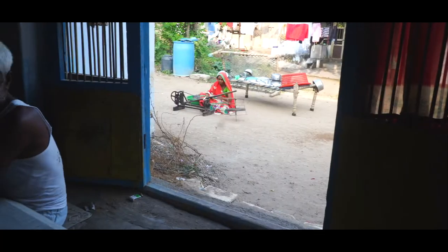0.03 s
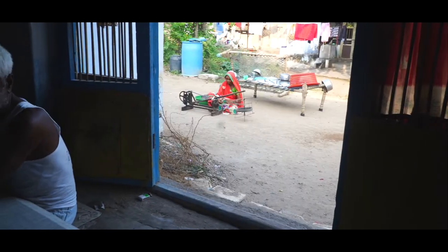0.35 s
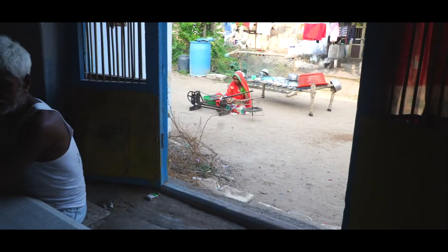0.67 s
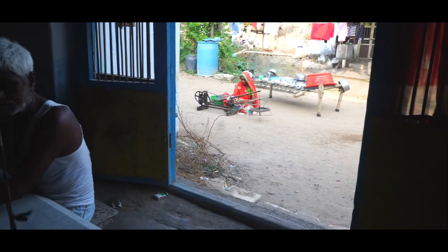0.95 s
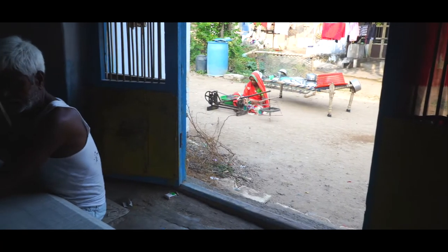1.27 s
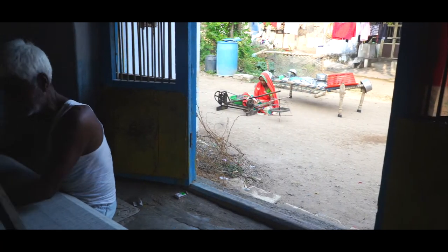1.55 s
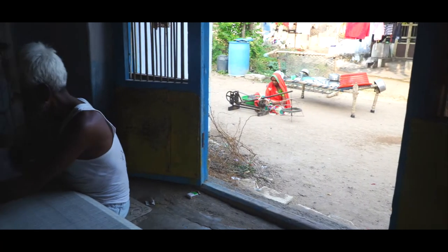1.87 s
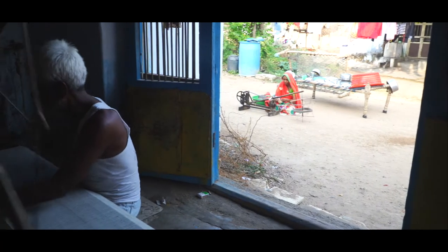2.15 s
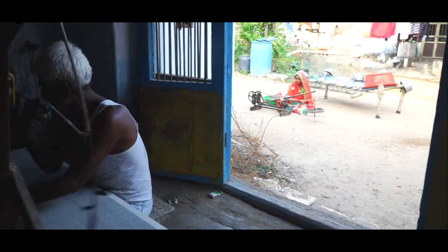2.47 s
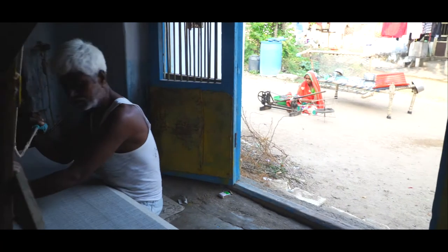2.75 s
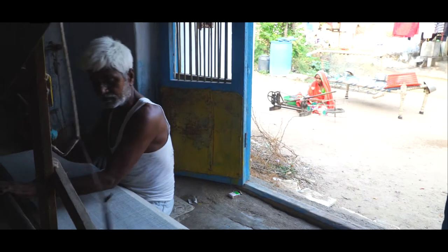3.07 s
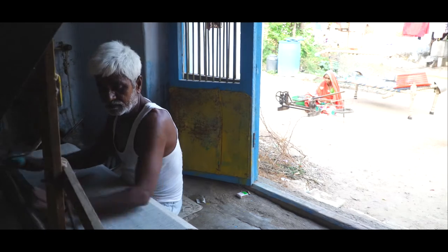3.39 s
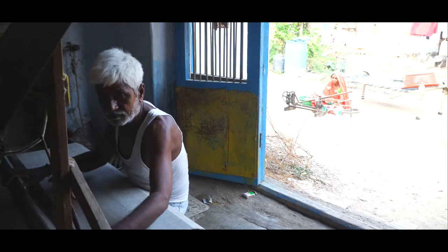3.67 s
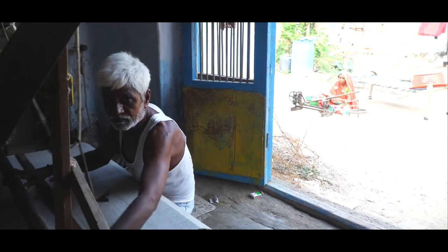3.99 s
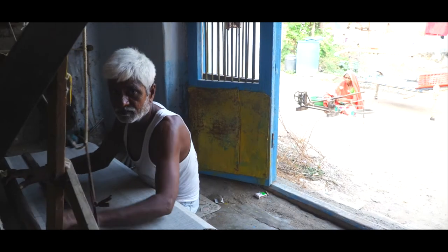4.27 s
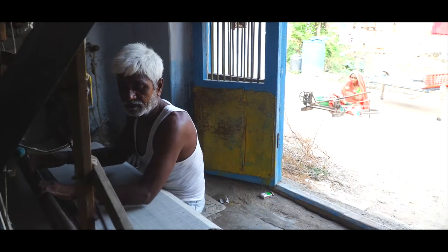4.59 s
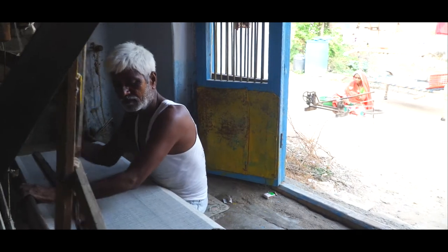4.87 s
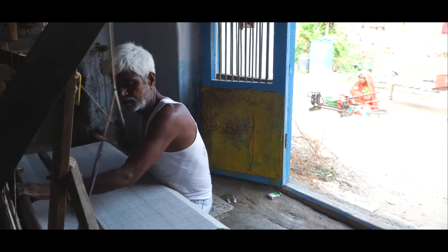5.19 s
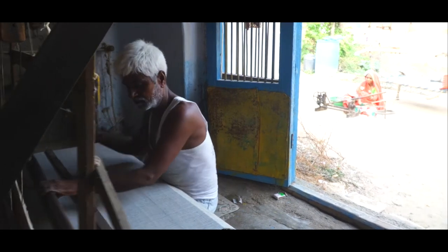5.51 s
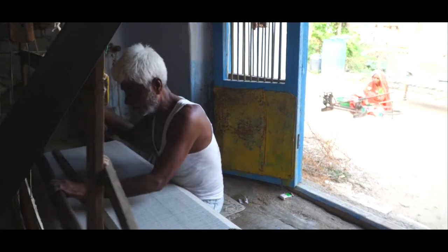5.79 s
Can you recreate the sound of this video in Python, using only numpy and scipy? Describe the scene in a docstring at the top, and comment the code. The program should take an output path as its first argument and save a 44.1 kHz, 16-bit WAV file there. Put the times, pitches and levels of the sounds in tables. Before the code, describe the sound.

A wooden handloom works in a steady rhythm, about one pass every three quarters of a second. In each pass the shafts tap, the beater knocks, a cord snaps and the shuttle slams into its box, alternately sharp and near, then duller and farther off. Threads rub faintly between the blows. The microphone stands beside the loom in a small, slightly echoing room, with a soft draught rumbling underneath.

```python
"""A wooden fly-shuttle handloom works in a small plastered room with the door open. In each pass the shafts
tap, the beater knocks, the cord snaps the picker, and the shuttle hops across the warp and slams into its box,
near and far in turn. Each impact excites the modes of the wood and the reverberation of the room. Friction
makes the warp rub and the shuttle squeak faintly. Over the quiet air of the yard, a draught rumbles on the
microphone, which turns from the door to the loom midway."""
import sys
import numpy as np
from scipy import signal
from scipy.fft import rfft, irfft
from scipy.io import wavfile
from scipy.ndimage import uniform_filter1d

SR = 44100
rng = np.random.default_rng(int(sys.argv[2]) if len(sys.argv) > 2 else 0)


def transcribe(u):
    """Save the signal u as a 16-bit wav file named by the first command-line argument.

    u: samples, shape (n,) or (channels, n), limited to [-1, 1]; the rate is SR.
    q: integer samples, one column per channel.
    """
    v = np.clip(np.atleast_2d(u).T, -1, 1)
    q = np.round(v * 32767).astype(np.int16)
    wavfile.write(sys.argv[1], SR, q)


N = 266805
TIME = np.arange(N) / SR
SIZE = 32768  # samples in one event
AGE = np.arange(SIZE) / SR
FREQS = np.maximum(np.fft.rfftfreq(SIZE, 1 / SR), 1)
TURN_SPAN_S, TURN_TILT_DB = (1.4, 3.7), 2.3  # the microphone turns; the frame gains treble, per octave


def undb(db):
    """Amplitude ratio of a level in decibels."""
    return 10 ** (np.asarray(db) / 20)


def unit(x):
    """Normalisation to rms 1."""
    return x / np.sqrt(np.mean(x ** 2))


def colour(points, freqs):
    """Spectral envelope: gain interpolated between (frequency [Hz], level [dB]) points."""
    hz, db = np.transpose(points)
    return undb(np.interp(np.log(freqs), np.log(hz), db))


def tint(x, points):
    """Spectral shaping: x filtered by an envelope, at rms 1."""
    freqs = np.maximum(np.fft.rfftfreq(len(x), 1 / SR), 1)
    return unit(irfft(rfft(x) * colour(points, freqs), len(x)))


def wander(rate_hz, size):
    """Random modulation: Gaussian values joined by straight lines, with a spread near 1."""
    steps = np.arange(size) * rate_hz / SR
    return np.interp(steps, np.arange(size), rng.standard_normal(size))


def add(track, s, sound):
    """Superposition: a sound joins the track at s seconds."""
    start = max(int(s * SR), 0)
    track[start:start + len(sound)] += sound[:max(N - start, 0)]


def fade(t60):
    """Exponential decay of 60 dB in t60 seconds."""
    return np.exp(-np.log(1000) * AGE / t60)


def minimum_phase(gain):
    """Causality: the response with this gain that starts at once and rings afterwards."""
    cepstrum = irfft(np.log(gain + 1e-9))
    cepstrum[1:SIZE // 2] *= 2
    cepstrum[SIZE // 2 + 1:] = 0
    return np.exp(rfft(cepstrum))


def whitening(burst):
    """Spectral whitening: a gain that levels broad humps and keeps the fine structure."""
    power = uniform_filter1d(np.abs(rfft(burst)) ** 2, 600)
    return np.sqrt(power.mean() / power)


def wood(spectrum, modes, ring_db):
    """Modal response: clear resonances over a bed of dense ones; each struck spot favours other modes."""
    spots_db = 2 * rng.standard_normal(len(modes))
    mode_power = sum(undb(db + ring_db + spot_db) ** 2 / (1 + (2 * (FREQS - hz) / width) ** 2)
                     for (hz, width, db), spot_db in zip(modes, spots_db))
    bed = colour(spectrum, FREQS) * undb(1.8 * wander(900, len(FREQS)))
    return np.sqrt(bed ** 2 + mode_power)


# decay of the plastered room: (frequency [Hz], reverberation time [s])
ROOM_DECAY = [(150, 0.45), (450, 0.41), (1000, 0.37), (2500, 0.3), (6000, 0.31), (13000, 0.24)]

def room_tail():
    """Reverberation: a diffuse field of reflections in which the treble dies first."""
    hz, t60s = np.transpose(ROOM_DECAY)
    noise = rfft(rng.standard_normal(SIZE))
    bands = (np.interp(np.log(FREQS), np.log(hz), row) for row in np.eye(len(hz)))
    return sum(irfft(noise * band) * fade(t60) for band, t60 in zip(bands, t60s))


def impacts(rows, spectrum, modes, *, gain_db, ring_db, crack_db, rattle_t60, room_db, chatter_db):
    """Impact excitation: crack, rattle and reverberation, filtered by wood. Levels are re gain_db."""
    track = np.zeros(N)
    for s, db, tilt_db, rise_ms, *_ in rows:
        swell = 1 - np.exp(-AGE * 1000 / max(rise_ms, 0.05))
        looseness = np.clip(wander(700, SIZE), -1.5, 1.5)
        rattle = unit(undb(chatter_db * looseness) * rng.standard_normal(SIZE)) * fade(rattle_t60)
        room = undb(room_db) * room_tail() * (1 - np.exp(-AGE / 0.0036))
        softness = 1 + rise_ms  # a glancing blow has a weak, dull crack
        crack = np.sign(rng.standard_normal(SIZE)) * fade(0.009) * undb(crack_db) / softness
        crack = signal.lfilter(*signal.butter(1, 15000 / softness, fs=SR), crack)
        crack = crack + 0.35 * np.roll(crack, int(0.007 * SR))  # floor reflection
        force = crack + (rattle + room) * swell
        tilt = undb(tilt_db * np.log2(np.clip(FREQS, 500, 4800)))  # harder contact lifts the treble
        body = unit(wood(spectrum, modes, ring_db) * tilt)
        response = minimum_phase(body * whitening(force))
        add(track, s, undb(db + gain_db) * irfft(rfft(force) * response))
    return track


# still air of the yard: (frequency [Hz], relative level [dB])
YARD_SPECTRUM = [(18, -37.5), (30, 5), (141, -12), (210, -12), (449, -2.5), (962, -3.5), (1720, -18),
                 (5040, -15.5), (11100, -33), (13300, -35), (16000, -52.5)]

def yard():
    """Ambient noise: a faint, broad hush whose level drifts."""
    return tint(rng.standard_normal(N), YARD_SPECTRUM) * undb(-63 + wander(2.7, N))


# bell-shaped gusts: (peak time [s], duration [s], level [dB])
DRAUGHT_GUSTS = [(0.296, 0.29, -49), (1.65, 0.11, -68), (2.721, .25, -50), (3.03, 0.35, -45.5),
                 (3.5, 0.18, -50), (4.15, 0.2, -53), (4.53, 0.32, -42.5), (5.58, 0.2, -46)]

def draught():
    """Turbulence: slow pressure fluctuations buffet the microphone, in gusts over a wavering lull."""
    spectrum = [(4, -23), (10, 3.5), (20, -11), (40, -24.5), (100, -33), (400, -69.5), (2000, -120)]
    buffet = tint(rng.standard_normal(N), spectrum)
    gusts = sum(undb(db) * np.exp(-(2 * (TIME - s) / length) ** 2) for s, length, db in DRAUGHT_GUSTS)
    lull = undb(-57.5 + 2.3 * wander(7.6, N))
    return buffet * (gusts + lull)


# rubbing threads: (frequency [Hz], relative level [dB])
WARP_SPECTRUM = [(100, -7.5), (280, 4), (550, -0.5), (950, 0), (1600, -3.5), (3000, -10), (5500, -17.5),
                 (9000, -22), (14000, -39.5), (16000, -42)]
RUB_ATTACK_S, RUB_HOLD_S, RUB_RELEASE_S = 0.21, 0.32, 0.16
RUB_DB, RUB_SAG_DB_PER_S = -52.5, -14.5
REST_FACING_DOOR_DB, REST_FACING_LOOM_DB = -68, -62
PASS_S = 0.71  # from one change of shed to the next

def warp():
    """Stick-slip friction: threads catch and slip as the shed changes, and some flick the reed."""
    slips_db = 2.5 * wander(400, N) + 1.5 * wander(35, N)
    rub = tint(rng.standard_normal(N) * undb(slips_db), WARP_SPECTRUM)
    impulses = (rng.random(N) < 25 / SR) * rng.standard_normal(N)  # about 25 a second
    flicks = signal.fftconvolve(impulses, rng.standard_normal(SIZE) * fade(0.04))[:N]
    reed = tint(flicks, [(1000, -25), (5000, 0), (7000, 0), (10000, -10), (14000, -15), (16000, -25)])
    corners_s = np.cumsum([0, RUB_ATTACK_S, RUB_HOLD_S, RUB_RELEASE_S])
    swell = [0, undb(RUB_DB), undb(RUB_DB + RUB_SAG_DB_PER_S * RUB_HOLD_S), 0]
    starts = [s for s, *_ in SHED_CHANGES]
    starts.insert(0, starts[0] - PASS_S)  # the weaving is already under way
    swells = sum(np.interp(TIME - s, corners_s, swell) for s in starts)
    rest = undb(np.interp(TIME, TURN_SPAN_S, (REST_FACING_DOOR_DB, REST_FACING_LOOM_DB)))
    return (rub + undb(-18) * reed) * (rest + swells)


# the shuttle slides into the far box:
# (time [s], level [dB], tilt [dB/octave], rise [ms], rebound delay [s], rebound level re blow [dB])
FAR_LANDINGS = [(0.006, -7.5, 0.5, 6.1, 0.065, -6), (1.410, -6.5, 0.6, 7.6, 0.073, -7.5),
                (3.254, -7.5, 1.8, 13.8, 0.089, -12), (4.689, -11.5, 3.5, 5, 0.048, -14)]
# dense modes of the far box: (frequency [Hz], relative level [dB])
FAR_SPECTRUM = [(47, -56), (80, -33), (309, -3.5), (404, -7), (515, -1.5), (588, -7), (657, 0), (1120, 1),
                (1670, -6), (2180, -9), (4230, -17.5), (14300, -50), (16000, -61.5)]
# its clear modes: (frequency [Hz], bandwidth [Hz], relative level [dB])
FAR_RESONANCES = [(522, 35, -3), (678, 31, -5), (1100, 27, 0), (1250, 61, 0), (2120, 83, -10),
                  (2650, 120, -13), (3350, 53, -14), (4110, 140, -17), (4620, 24, -21)]

def far_box():
    """Glancing impact: long contact softens the crack as the shuttle lands, before it rebounds."""
    landings = impacts(FAR_LANDINGS, FAR_SPECTRUM, FAR_RESONANCES, gain_db=-3, ring_db=-2,
                       crack_db=14, rattle_t60=0.12, room_db=-5.5, chatter_db=2.5)
    return landings + rebounds(FAR_LANDINGS)


def rebounds(landings, tilt_db=-1):
    """Restitution: the shuttle bounces once in its box, weaker than it landed."""
    return tocks([(s + delay_s, db + rebound_db) for s, db, _, _, delay_s, rebound_db in landings],
                 tilt_db)


def tocks(contacts, tilt_db, rise_ms=0.98):
    """Brief contact: the shuttle draws a short, hollow tock from the modes of the frame."""
    rows = [(s, db, tilt_db, rise_ms) for s, db in contacts]
    return frame(rows, gain_db=-4.5, ring_db=-2, crack_db=9, rattle_t60=0.035, room_db=-19, chatter_db=3)


# dense modes of the frame: (frequency [Hz], relative level [dB])
FRAME_SPECTRUM = [(59, -62.5), (100, -30), (295, -8.5), (442, -9.5), (648, 0.5), (736, -6), (930, 5),
                  (1200, -2.5), (1360, -3), (2130, -12.5), (3620, -13.5), (13800, -48), (16000, -53)]
# its clear modes: (frequency [Hz], bandwidth [Hz], relative level [dB])
FRAME_RESONANCES = [(228, 17, -11.5), (308, 10, -11), (521.3, 14, 1), (626, 5.3, -1), (793.5, 19, 8),
                    (893, 30, 5.5), (1100, 64, -3), (1090, 69, -3.5), (1240, 15, -7.5), (1898, 70, -8.5),
                    (2675, 29, -22), (3467, 47, -19)]

def frame(rows, **contact):
    """Directivity: blows on the frame sound brighter as the microphone turns to face the loom."""
    heard = [(s, db, tilt_db + np.interp(s, TURN_SPAN_S, (0, TURN_TILT_DB)), rise_ms)
             for s, db, tilt_db, rise_ms in rows]
    return impacts(heard, FRAME_SPECTRUM, FRAME_RESONANCES, **contact)


def knocks(rows):
    """Free vibration: the knocked frame rings on in its modes."""
    return frame(rows, gain_db=-7, ring_db=0, crack_db=7.5, rattle_t60=0.053, room_db=-9, chatter_db=1)


# loose joints settle: (time [s], level [dB])
JOINT_SETTLES = [(.279, -39), (0.925, -29), (1.002, -41), (2.345, -34.5), (3.457, -35), (4.209, -40.5),
                 (5.043, -34)]

def joints(tilt_db=1.1, rise_ms=1):
    """Mechanical play: loose joints knock lightly as the frame settles between passes."""
    return knocks([(s, db, tilt_db, rise_ms) for s, db in JOINT_SETTLES])


# stray ticks of the heddles: (time [s], level [dB])
HEDDLE_TICKS = [(0.2813, -53), (1.67, -57), (4.5905, -44), (4.9038, -44.5)]

def heddle_and_cord_ticks(lag_s=0.0037, cutoff_hz=13000):
    """Damped transients: thin ticks of stray heddles, and of the cord coming taut after each pick."""
    track = np.zeros(N)
    cord_ticks = [(s + lag_s, tick_db) for s, *_, tick_db, _, _ in PICKER_SNAPS]
    for s, db in cord_ticks + list(HEDDLE_TICKS):
        tick = rng.standard_normal(SIZE) * fade(0.0055) + undb(-21.5) * room_tail()
        add(track, s, undb(db) * np.diff(tick))  # differentiation thins the bass
    return signal.lfilter(*signal.butter(2, cutoff_hz, fs=SR), track)


# a treadle changes the shed: (time [s], level [dB], tilt [dB/octave], rise [ms])
SHED_CHANGES = [(0.39, -21.5, 2, 6.9), (1.0935, -18.5, 2, 1.2), (1.803, -26, 0.8, 2.6),
                (2.946, -24.5, -2, 6), (3.649, -27.5, -0.5, 2.7), (4.380, -21, 0.5, 4.7),
                (5.097, -21.5, 1.2, 2), (5.797, -22.5, 1.5, 4.7)]

def shafts():
    """Impact: the shafts, moved by a treadle, tap the frame."""
    return knocks(SHED_CHANGES)


# strokes of the beater: (time [s], level [dB], rise [ms], bounce level re knock [dB])
BEATER_STROKES = [(0.418, -15, 1.6, 0), (1.152, -15, 1.6, -7), (1.829, -18, 0.59, 3.5),
                  (2.980, -12, 4.5, -13), (3.68, -13, 3.2, -5.5), (4.446, -18.5, 4.4, -14),
                  (5.127, -10, 5.8, -16), (5.855, -17, 9.6, -8)]

def beater(tilt_db=-0.6, bounce_s=0.029, bounce_tilt_db=-0.9, bounce_rise_ms=1):
    """Elastic rebound: the beater knocks and bounces once."""
    rows = []
    for s, db, rise_ms, bounce_db in BEATER_STROKES:
        rows.append((s, db, tilt_db, rise_ms))
        rows.append((s + bounce_s, db + bounce_db, bounce_tilt_db, bounce_rise_ms))
    return knocks(rows)


# the cord snaps the picker: (time [s], level [dB], tilt [dB/octave], rise [ms], frame jolt level [dB],
# cord tick level [dB], shuttle hop interval [s], first hop level [dB])
PICKER_SNAPS = [(0.4977, -29, 2, 8, -7.5, -55, 0.053, -21), (1.206, -20, -0.1, 3.7, -18, -25, .0705, -17),
                (1.9129, -23, 0.4, 12, -10, -55, .053, -18.5),
                (2.5569, -25.5, 4.5, 8.4, -39, -58, 0.037, -20.5),
                (3.062, -25.5, 1, 11, -22.5, -29.5, 0.1, -27.5),
                (3.7593, -23.5, 1.6, 5.6, -15, -39, .135, -29.5),
                (4.494, -21.5, 1, 11.8, -20, -26.5, .091, -31),
                (5.2, -23.5, 1, 5.1, -19.5, -37, 0.04, -22.5),
                (5.914, -21.5, 0.9, 7.7, -22, -27, 0.091, -23.5)]
# dense modes heard in the snap: (frequency [Hz], relative level [dB])
PICKER_SPECTRUM = [(59, -43), (100, -22), (135, -9), (1130, 1.5), (1280, 2), (1420, -1), (2630, -9.5),
                   (3250, -9.5), (6150, -18.5), (7610, -16.5), (9610, -31.5), (13800, -41.5), (16000, -53)]

def picker(jolt_lead_s=0.004, jolt_tilt_db=0.05, jolt_rise_ms=2.4):
    """Impulse and reaction: the tug on the cord jolts the frame just before the picker snaps."""
    jolts = knocks([(s - jolt_lead_s, jolt_db, jolt_tilt_db, jolt_rise_ms)
                    for s, _, _, _, jolt_db, *_ in PICKER_SNAPS])
    snaps = impacts(PICKER_SNAPS, PICKER_SPECTRUM, FRAME_RESONANCES, gain_db=1.5, ring_db=-7,
                    crack_db=17, rattle_t60=0.089, room_db=-6.5, chatter_db=5)
    return jolts + snaps


def shuttle_hops(loss_db=10):
    """Inelastic collision: the shuttle hops twice after each pick, weaker the second time."""
    hops = [(s + (k + 1) * hop_s, hop_db - k * loss_db)
            for s, *_, hop_s, hop_db in PICKER_SNAPS for k in range(2)]
    return tocks(hops, tilt_db=-5.5)


# the shuttle's runner squeaks as it runs, mostly just before it lands: (time [s], frequency [Hz], level [dB])
SHUTTLE_SQUEAKS = [(0.615, 8250, -54), (0.648, 8660, -55.5), (2.077, 8700, -58), (3.215, 8700, -59),
                   (3.57, 6500, -66), (3.942, 9600, -61), (4.349, 6770, -65)]

def shuttle_squeaks(peak_s=0.0125):
    """Friction-induced vibration: a short, jittering tone with a weaker resonance above it."""
    track = np.zeros(N)
    grip = AGE / peak_s * np.exp(1 - AGE / peak_s)
    for s, hz, db in SHUTTLE_SQUEAKS:
        pitch_hz = hz * (1 + 0.04 * wander(2500, SIZE))
        phase = 2 * np.pi * np.cumsum(pitch_hz) / SR
        squeak = np.sin(phase) + 0.6 * np.sin(1.19 * phase)
        add(track, s, undb(db) * grip * squeak)
    return track


# the shuttle strikes the near box:
# (time [s], level [dB], tilt [dB/octave], rise [ms], rebound delay [s], rebound level re blow [dB])
NEAR_LANDINGS = [(0.7183, -5, -0.3, 0.091, .053, -9.5), (2.1340, -4, -0.54, 0.042, 0.072, -14.5),
                 (3.9807, -5.5, 0.7, 1.4, 0.069, -17), (5.4184, -5, 0.66, 2.2, 0.062, -15)]
# dense modes of the near box: (frequency [Hz], relative level [dB])
NEAR_SPECTRUM = [(30, -41), (60, -40.5), (140, -45.5), (230, -15), (330, -18.5), (520, -11), (720, -6.5),
                 (1000, 0.5), (1400, -6.5), (2000, -3.5), (3000, -8.5), (5000, -9.5), (8000, -17.5),
                 (10900, -33.5), (14500, -38.5), (16000, -44)]
# its clear modes: (frequency [Hz], bandwidth [Hz], relative level [dB])
NEAR_RESONANCES = [(937, 45, 0), (1470, 21, -7), (1930, 140, -4), (2500, 62, -9), (3000, 140, -9),
                   (3630, 60, -10), (4080, 54, -9), (4320, 41, -6), (5510, 31, -9), (5750, 57, -13),
                   (6060, 87, -14), (6590, 81, -13), (7420, 40, -17), (8610, 40, -21)]

def near_box():
    """Hard impact: the shuttle grazes the box mouth, lands with a brief, bright crack and rebounds."""
    grazes = [(s - 0.004, db - 17.5, tilt_db, rise_ms + 1)
              for s, db, tilt_db, rise_ms, *_ in NEAR_LANDINGS]
    landings = impacts(list(NEAR_LANDINGS) + grazes, NEAR_SPECTRUM, NEAR_RESONANCES, gain_db=-6,
                       ring_db=-4.5, crack_db=14, rattle_t60=0.12, room_db=-5, chatter_db=-1)
    return landings + rebounds(NEAR_LANDINGS)


def scene():
    """Superposition: all sources sum to one channel beside the loom."""
    background = yard() + draught() + warp()
    mechanism = joints() + heddle_and_cord_ticks() + shafts() + beater() + picker() + shuttle_squeaks()
    shuttle = far_box() + shuttle_hops() + near_box()
    return (background + mechanism + shuttle)[None]


def record(dry):
    """Clipping and band limiting: peaks stop at full scale, then the treble is cut above 16 kHz."""
    lowpass = signal.ellip(8, 0.2, 70, 16000, fs=SR, output="sos")
    return signal.sosfilt(lowpass, np.clip(dry, -1, 1))


dry = scene()
out = record(dry)
transcribe(out)
```